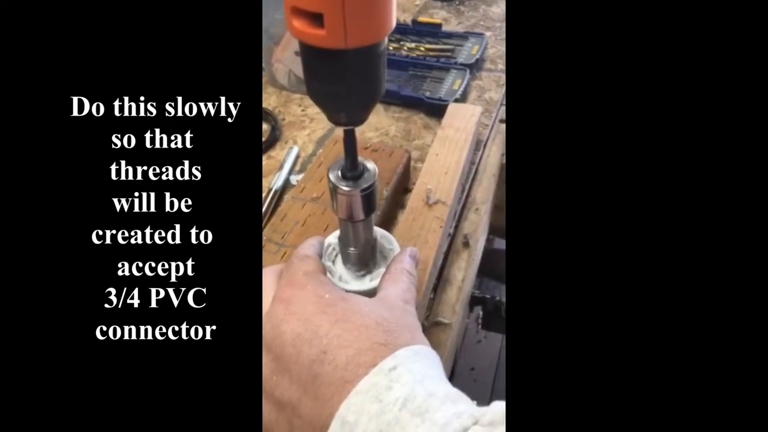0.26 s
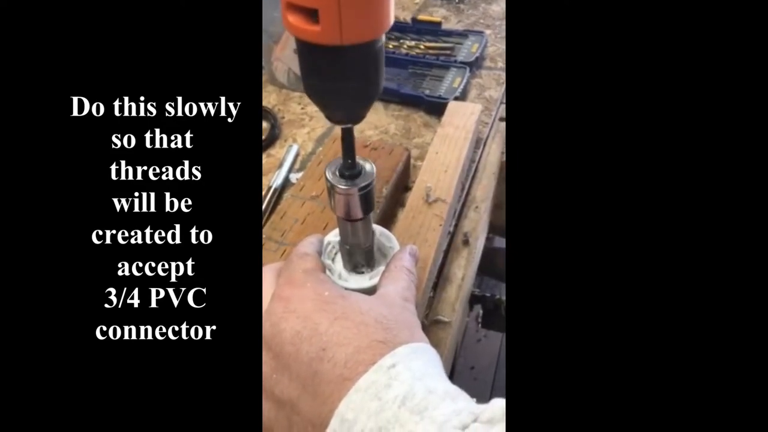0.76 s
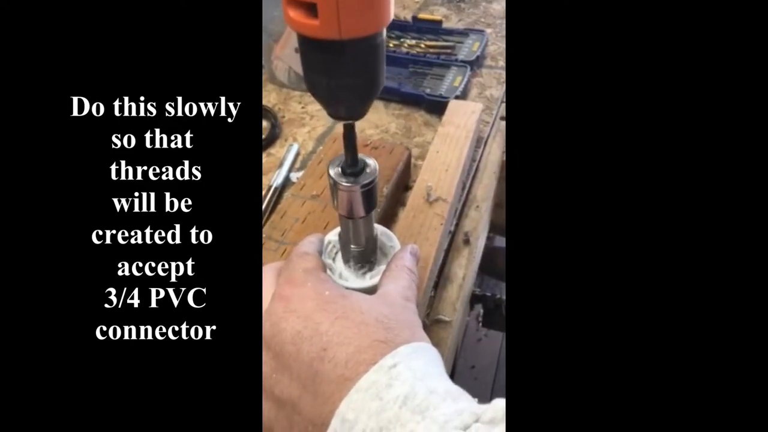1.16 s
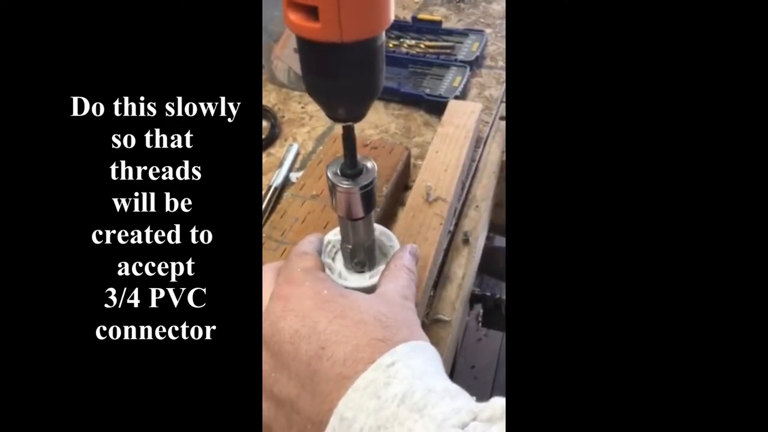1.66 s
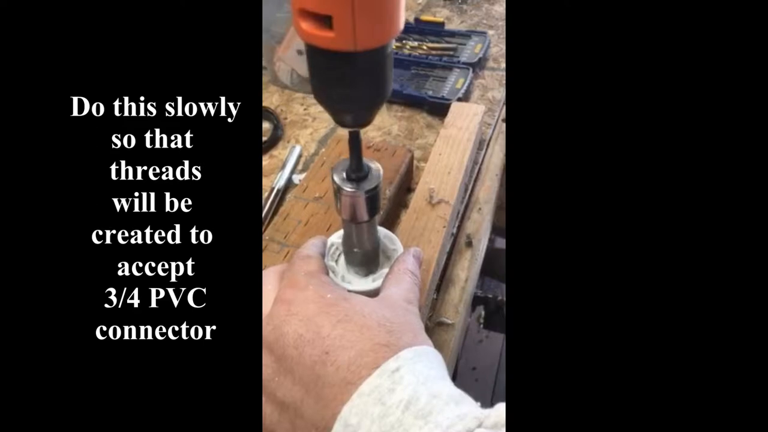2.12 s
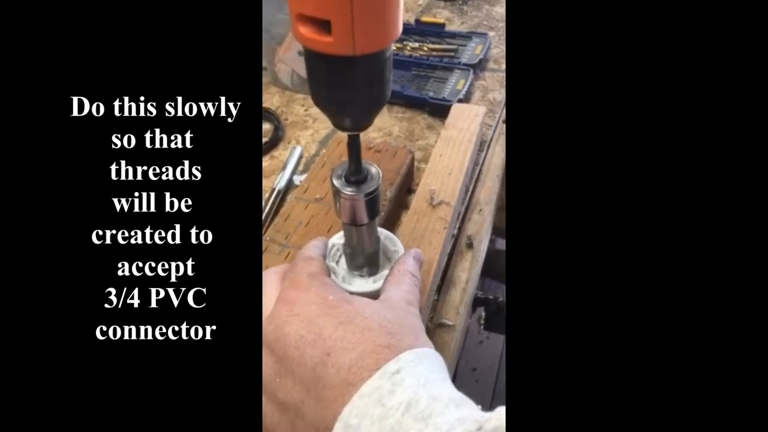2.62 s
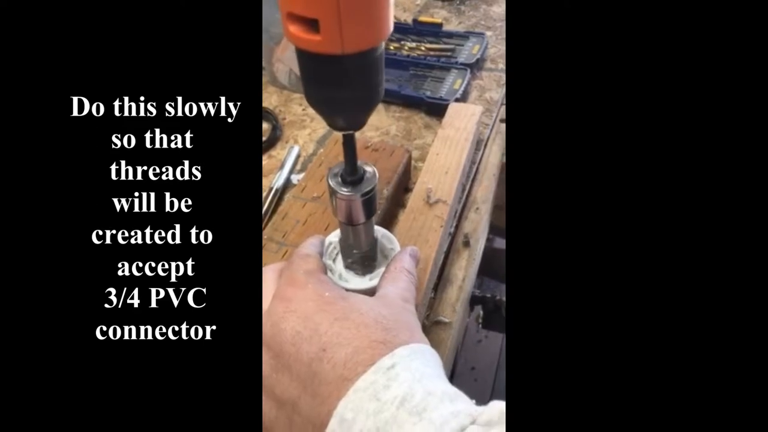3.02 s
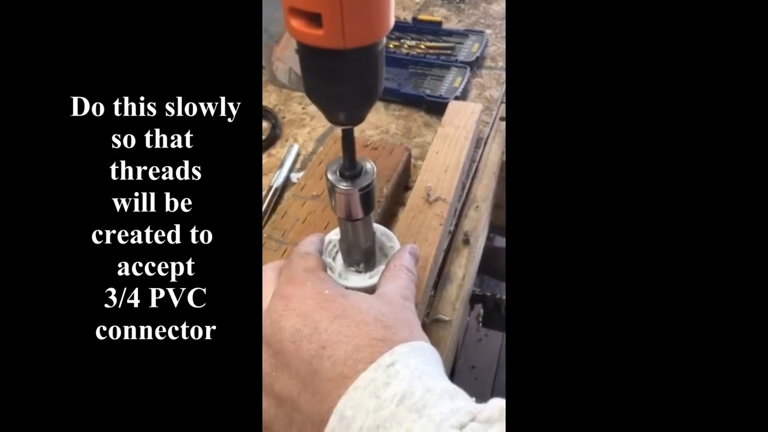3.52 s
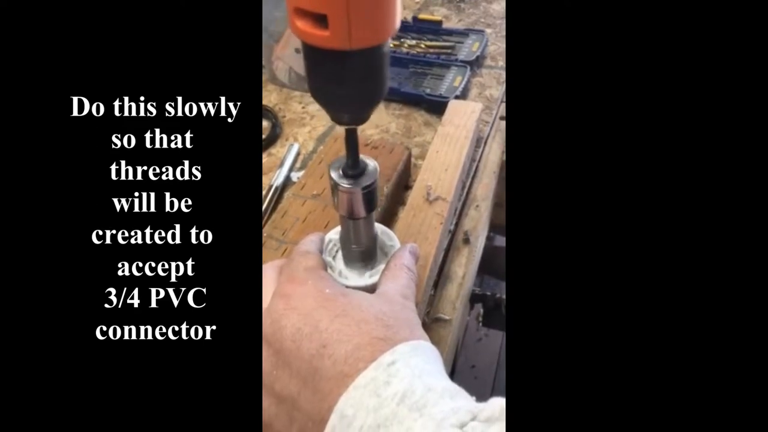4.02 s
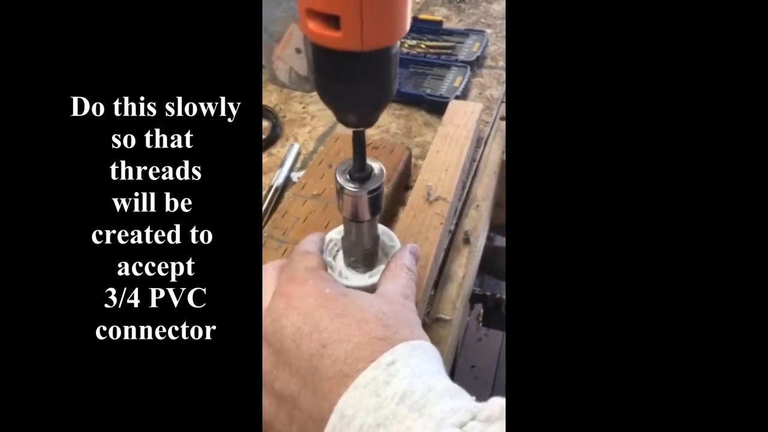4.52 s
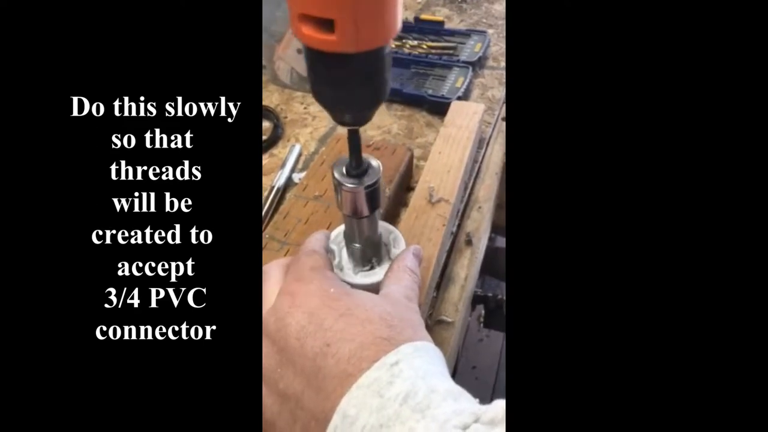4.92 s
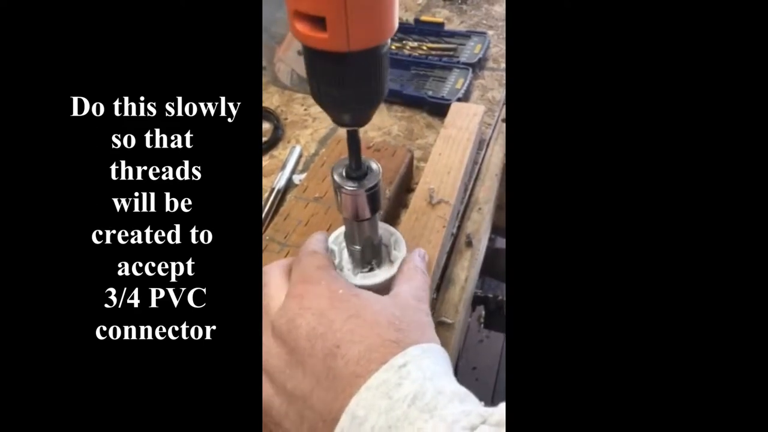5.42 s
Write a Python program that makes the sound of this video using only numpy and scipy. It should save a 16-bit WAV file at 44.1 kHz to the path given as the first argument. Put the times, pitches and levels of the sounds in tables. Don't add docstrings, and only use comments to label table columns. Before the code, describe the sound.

Coarse, buzzing gear rattle from a small electric drill, held close, almost mono. A first run of under half a second is followed by over a dozen jabs of the trigger, mostly slow and grating, a few fast and whining. Sharp clicks and low bench bumps punctuate them. Work stops near the end, leaving soft air, a distant motor hum, thin bird notes and one light tap.

```python
import sys
import numpy as np
from scipy import signal
from scipy.fft import rfft, irfft
from scipy.io import wavfile
from scipy.ndimage import uniform_filter1d

SR = 44100
rng = np.random.default_rng(int(sys.argv[2]) if len(sys.argv) > 2 else 0)


def wav_out(sig):
    wavfile.write(sys.argv[1], SR, np.round(np.clip(np.atleast_2d(sig).T, -1, 1) * 32767).astype(np.int16))


def invert_db(level):
    return 10 ** (np.asarray(level, dtype=float) / 20)


N = 250047


def level(x, db):
    return x * invert_db(db) / np.sqrt(np.mean(x ** 2))


def curve(table, column):
    rows = np.array(table, float)
    return np.interp(np.arange(N) / SR, rows[:, 0], rows[:, column])


def colour(x, points, peaks=(), size=2048):
    hz = np.maximum(np.arange(size // 2 + 1) * SR / size, 1)
    points = np.array(points)
    db = np.interp(np.log(hz), np.log(points[:, 0]), points[:, 1])
    db = db + sum(lift / (1 + (2 * (hz - f) / w) ** 2) for f, w, lift in peaks)
    cep = irfft(np.log(invert_db(db)))
    cep[1:size // 2] *= 2
    cep[size // 2 + 1:] = 0
    return signal.fftconvolve(x, irfft(np.exp(rfft(cep))))[:N]


def split(x, hz, kind, order=4):
    return signal.sosfilt(signal.butter(order, hz, kind, fs=SR, output="sos"), x)


def walk(rate):
    k = int(SR / rate)
    held = np.repeat(rng.standard_normal(N // k + 1), k)
    return 1.3 * uniform_filter1d(uniform_filter1d(held, k), k)[:N]


def knocks(turns, slip, scatter_db):
    whole = np.arange(1, int(turns[-1]))
    chance = rng.standard_normal((N // 8, 2))[:len(whole)]
    at = np.clip(np.interp(whole + slip * chance[:, 0], turns, np.arange(N)), 0, N - 2)
    size, first = invert_db(scatter_db * chance[:, 1]), at.astype(int)
    early = np.bincount(first, size * (1 + first - at), N)
    return early + np.bincount(first + 1, size * (at - first), N)


def steady(x, size=SR // 40):
    return x / np.sqrt(uniform_filter1d(x ** 2, size) + 1e-9)


# frequency in Hz, density in dB per Hz.
SHED = [(88, -2.5), (150, -21.5), (358, -8), (1270, -5.5), (1510, -2.5), (4240, -18.5), (4980, -27),
        (8190, -23.5), (10500, -55), (13600, -85), (22000, -120)]
# time in seconds, level in dB.
STIR = [
    (0, -54),
    (4.7, -53),
    (4.77, -47),
    (5.14, -48.5),
    (5.2, -65.5),
    (5.39, -63.5),
    (5.41, -72),
]


def shed():
    t = np.arange(N) / SR
    air = level(colour(rng.standard_normal(N), SHED), -66) * invert_db(walk(18))
    stir_colour = [(300, -1.5), (600, 0.5), (3000, -2.5), (5000, -4.5), (10000, -14.5)]
    stir = level(colour(rng.standard_normal(N), stir_colour), 0) * invert_db(curve(STIR, 1))
    hum = level(split(rng.standard_normal(N), [58, 68], "band", order=2), -48)
    hum = hum + invert_db(-62) * np.sin(2 * np.pi * 126 * t)
    duck_db = -4.5 * np.clip((5.2 - t) / .1, 0, 1)
    return air + stir + hum * invert_db(duck_db)


# time in seconds, pitch in Hz, level in dB.
BIRD = [
    [(5.34, 7650, -84), (5.365, 8000, -72), (5.39, 8150, -72), (5.42, 7900, -73), (5.455, 7520, -77.5),
     (5.49, 7750, -76), (5.52, 8250, -73)],
    [(5.605, 8450, -87.5), (5.635, 7850, -79.5), (5.67, 6900, -81)],
]


def bird():
    out = 0
    for call in BIRD:
        start, end = call[0][0], call[-1][0]
        on = np.interp(np.arange(N) / SR, [start, start + 0.012, end - .01, end], [0, 1, 1, 0])
        tone = np.sin(2 * np.pi * np.cumsum(curve(call, 1)) / SR)
        out = out + np.sqrt(2) * on * invert_db(curve(call, 2) + 2.45 * walk(66)) * tone
    return out


def room(x):
    t60_s, rise_s = 0.033, 0.0064
    t = np.arange(SR // 2) / SR
    tail = rng.standard_normal(len(t)) * np.exp(-np.log(1000) * t / t60_s) * np.minimum(t / rise_s, 1)
    return signal.fftconvolve(x, tail / np.sqrt(np.sum(tail ** 2)))[:N]


# pressed, let go and standing still in seconds, top mesh rate in Hz,
# housing level at the top in dB.
PULLS = [(0.041, 0.409, 0.5, 346, -20.5), (0.576, 0.72, 0.87, 400.3, -19.5),
         (.897, 1.031, 1.143, 340.2, -19), (1.245, 1.398, 1.655, 929.2, -14.5),
         (1.713, 1.886, 2.019, 430.9, -18.5), (2.111, 2.267, 2.498, 852.5, -14.5),
         (2.592, 2.715, 2.785, 268.3, -20.5), (2.882, 3.01, 3.088, 279.7, -21),
         (3.076, 3.1, 3.08, 170, -22.5), (3.077, 3.27, 3.37, 358.2, -19.5),
         (3.44, 3.566, 3.654, 380.7, -19), (3.71, 3.822, 3.86, 200, -23), (3.93, 4.071, 4.3, 828.7, -14.5),
         (4.347, 4.505, 4.694, 926.3, -14), (4.818, 4.971, 5.065, 604.2, -11.5)]


def motor():
    crawl_hz, spin_up_s = 70.12, .165
    climb_bend, coast_bend = .85, 1.2
    t = np.arange(N) / SR
    hz, db, on = np.full(N, crawl_hz), np.full(N, -70.), np.zeros(N)
    for pressed, let_go, still, top_hz, top_db in PULLS:
        at = slice(int(pressed * SR), int(still * SR))
        now = t[at]
        driven = now < let_go
        climb = np.minimum((now - pressed + 1e-4) / min(let_go - pressed, spin_up_s), 1) ** climb_bend
        coast = np.clip((still - now) / (still - let_go), 0, 1) ** coast_bend
        rate = crawl_hz + (top_hz - crawl_hz) * np.where(driven, climb, coast)
        speed_db = np.where(driven, 4.5, 6.5) * np.log2(rate / top_hz)
        dip_db = np.where(driven, 6, 21) * np.exp((crawl_hz - rate) / 51.3)
        idle_db = 9 * (now < pressed + .021)
        loud = top_db + speed_db - dip_db - idle_db
        hz[at], db[at], on[at] = np.maximum(hz[at], rate), np.maximum(db[at], loud), 1
    return hz, db, uniform_filter1d(on, SR // 250)


def boards(modes, lump_db):
    total = 0
    for f, width, db in modes:
        band = split(rng.standard_normal(N), [f - width / 2, f + width / 2], "band", order=2)
        total = total + level(band, db) * invert_db(lump_db * walk(18))
    return steady(total, size=SR // 8) * invert_db(2.0 * walk(45))


# frequency in Hz, width in Hz, level in dB.
THUD = [(38, 16, -19.5), (58, 18, 3), (70.7, 11, 1), (88.3, 25, 6), (121, 18, -3)]
# frequency in Hz, width in Hz, level in dB.
BOOM = [(140.2, 24, -6), (175.4, 25.5, -2), (208.3, 29, -0.5), (270.6, 48, -2), (335.5, 70, -10.5),
        (417, 50, -12), (570, 180, -13.5)]
# peak time in seconds, thud level in dB, boom level in dB.
JOLTS = [(0.151, -38, -40.5), (0.274, -36, -38), (0.422, -40.5, -42.5), (0.749, -34.5, -40.5),
         (.86, -42, -53), (1.06, -38.5, -40), (1.39, -31, -28.5), (1.448, -18.5, -21), (1.52, -30, -36),
         (1.6, -44, -56), (1.97, -41.5, -47), (2.22, -54, -32.5), (2.282, -22, -36), (2.32, -25, -29),
         (2.4, -38.5, -45), (2.68, -60, -40), (3.059, -42, -48), (3.302, -34.5, -42), (3.56, -51, -32),
         (3.62, -40, -46), (4.0, -46, -43), (4.07, -36, -25.5), (4.11, -26.5, -29), (4.16, -30.5, -39),
         (4.48, -46, -28), (4.52, -33, -30), (4.6, -28.5, -33.5), (4.85, -68, -38.5), (5.015, -35.5, -40)]


def bench():
    t = np.arange(0, N + 64, 64) / SR
    rows = np.array(JOLTS)[:, :, None]
    shake = invert_db(motor()[1] - 36.5)

    def jolts(column, rise_s, fall_s):
        away = np.maximum((rows[:, 0] - t) / rise_s, (t - rows[:, 0]) / fall_s)
        return np.repeat(invert_db((rows[:, column] - 20 * away).max(0)), 64)[:N]

    thud, boom = jolts(1, 0.027, 0.13), jolts(2, 0.095, 0.099)
    bumps = knocks(np.arange(N) * 55 / SR, .4, 3.5) * np.sign(walk(60))
    bumps = level(split(split(bumps, 80, "high", order=2), 240, "low"), -4)
    low = (thud + invert_db(-61) + shake) * boards(THUD, 4.5)
    high = (0.68 * boom + invert_db(-60) + shake) * boards(BOOM, 3.7)
    return low + high + (0.59 * thud + boom) * bumps


# time in seconds, peak level in dB, treble level in dB.
TRIGGER = [(0.0159, -28, -12), (.031, -26, -12), (0.5423, -29.5, -7), (0.565, -26, -11),
           (0.8823, -25.5, -11), (1.1958, -27, -7), (1.216, -26, -13), (1.2308, -20, -18),
           (1.6557, -36.5, 1), (1.6831, -27, -9), (1.6966, -25.5, -11), (2.071, -33, -3),
           (2.098, -24.5, -12), (2.531, -24, -15), (2.5647, -28, -11), (2.83, -31.5, -2.5),
           (2.8649, -26, -7), (3.3822, -36, -5), (3.4007, -30, -18), (3.415, -26, -12), (3.682, -29, -10),
           (3.6977, -25.5, -13), (4.3046, -34, -9), (4.3326, -29.5, -11), (4.7516, -25, -16),
           (4.7652, -12.5, -16), (4.815, -26, -10), (5.126, -24.5, -15)]
# time in seconds, peak level in dB.
SLACK = [(.068, -33), (.4874, -29), (0.6014, -23), (0.92, -27), (1.2506, -19.5), (1.27, -14), (1.731, -37),
         (2.115, -25), (2.1346, -25), (2.587, -27.5), (2.6, -33), (2.916, -24), (3.0996, -23), (3.432, -27),
         (3.467, -26), (3.7323, -29), (3.808, -14), (3.9306, -26), (3.952, -28), (4.3463, -32),
         (4.368, -36), (4.399, -15), (4.8328, -30), (5.087, -36), (5.161, -49), (5.174, -42),
         (2.487, -38.5), (3.644, -33), (3.72, -27), (4.285, -35.5)]
# time in seconds, peak level in dB, ring in Hz, treble level in dB.
TAP = (5.5117, -37, 1350, -26)


def clicks():
    trigger_hz, slack_hz, slack_treble_db = 3185, 2673, -28.5
    decay_s, rise_s = 0.028, 0.00084
    snaps = [(s, db, trigger_hz, treble_db) for s, db, treble_db in TRIGGER] + [TAP]
    snaps += [(s, db, slack_hz, slack_treble_db) for s, db in SLACK]
    out, t = np.zeros(N + 4096), np.arange(4096) / SR
    fade = np.exp(-np.log(1000) * t / decay_s) * np.minimum(t / rise_s, 1)
    for s, db, hz, treble_db in snaps:
        hiss = rng.standard_normal(4096)
        hz = hz * (1 + 0.072 * hiss[0])
        ring = .1 * np.sin(2 * np.pi * hz * t)
        puff = 0.33 * split(hiss, [1000, 5000], "band") + 0.31 * split(hiss, [500, 1100], "band")
        treble = invert_db(treble_db - 12) * split(hiss, 5000, "high")
        snap = fade * (ring + puff + treble)
        start = int(s * SR)
        out[start:start + 4096] += invert_db(db) * snap / np.abs(snap).max()
    return out[:N]


def kicked(hz, coasting):
    kick_hz = 29.94
    kick = (np.arange(N) / SR * kick_hz + .15) % 1 - .5
    sag = kick * (np.gradient(hz) * SR / kick_hz + .06 * hz)
    return hz - (1 - coasting) * uniform_filter1d(sag, SR // 200)


# multiple of the mesh rate, level in dB.
WHINE = [(1, -26), (2, -21), (3, -24), (4, -18), (5, -24)]


def gears(hz, coasting):
    turns = np.cumsum(hz) / SR
    teeth = knocks(turns, .013, 2.5) * invert_db(2.5 * walk(45))
    teeth = steady(teeth - uniform_filter1d(teeth, size=34))
    stray = steady(knocks(turns * 1.57, .6, 3.2) * np.sign(walk(900)))
    after_knock = np.exp(-(turns % 1) / .25)
    rattle = rng.standard_normal(N) * (.1 + hz / 1200 + after_knock) * invert_db(2.2 * walk(150))
    rattle = steady(rattle)
    share = np.clip(.05 + hz / 1600 * (.85 + .55 * coasting), .33, .8)
    force = np.sqrt(share) * teeth + np.sqrt(1 - share) * (0.75 * stray + 0.85 * rattle)
    whine = sum(invert_db(db + 4.5 * walk(40)) * np.cos(2 * np.pi * k * turns) for k, db in WHINE)
    force += whine * np.clip((hz - 380) / (800 - 380), 0, 1) * (.7 + .3 * coasting)
    chop_hz = 61.3
    return force * (1 + 0.28 * np.exp(-hz / 200) * np.cos(2 * np.pi * chop_hz * np.arange(N) / SR))


# frequency in Hz, level in dB.
SHELL = [(300, -29), (450, -24.5), (800, -23.5), (1500, -20.5), (2100, -5.5), (2500, -9), (4500, -15),
         (5000, -21.5), (6300, -18.5), (7200, -32.5), (9000, -40), (10600, -68)]
# frequency in Hz, width in Hz, lift in dB.
HOUSING = [(612, 130, 12.5), (1028, 144, 9.5), (1376, 280, 9.5), (1777, 120, 3.5), (2706, 270, 8.5),
           (3408, 280, 4.5), (3770, 240, 3), (4443, 470, 5.5), (5260, 39, 8.5), (5707, 400, 10),
           (6880, 340, 6), (7960, 800, 12), (10045, 1510, 37)]


def housing(force):
    return colour(force, SHELL, HOUSING)


def panels(ring, bright_db):
    body = split(split(ring, 1950, "high"), 4900, "low")
    lower = level(split(body, 3150, "low"), 0) * invert_db(0.82 * walk(30))
    upper = level(split(body, 3150, "high"), 0) * invert_db(1.0 * walk(30) + bright_db)
    return level((lower + upper) / np.sqrt(1 + invert_db(2 * bright_db)), 0)


def brushes(ring):
    hiss = split(housing(rng.standard_normal(N)), 7300, "high")
    return level(level(split(ring, 4900, "high"), 0) + level(hiss, -26), 0)


def drill():
    hz, body_db, running = motor()
    coasting = uniform_filter1d(1. * (np.gradient(hz) < 0), SR // 100)
    bright_db = -4.5 + 6 * hz / 1000 + 3 * coasting + 0.76 * (np.maximum(body_db, -35) + 19.5)
    hz = kicked(hz, coasting)
    hiss_db = -26 + 0.011 * hz + 1100 / (hz + 40) + .5 * bright_db
    low_db = -8.5 - 0.36 * (np.maximum(body_db, -50) + 21.5)
    ring = housing(gears(hz, coasting))
    main = panels(ring, bright_db)
    low = level(split(ring, 1950, "low") * invert_db(2.2 * walk(25.16)), 0)
    chuck = boards([(226, 46, -6), (296.3, 58, 7.5), (339.0, 110, -1.5)], 4.2)
    mix = main + invert_db(low_db) * low + invert_db(hiss_db) * brushes(ring) + invert_db(low_db - 14.5) * chuck
    return running * invert_db(body_db) * mix


# frequency in Hz, level in dB.
BENCH_SIDE = [(60, -31), (125, -28), (250, -19), (500, -18)]


def scene():
    near = drill() + clicks()
    mid = near + invert_db(-12) * room(near) + bench() + shed() + bird()
    side_colour = [(250, 5.0), (600, 5.5), (1200, 4), (3000, -5), (5000, 6.0), (9000, 11.5)]
    side = invert_db(-23) * room(colour(near, side_colour))
    side = side + invert_db(-34.5) * shed() + colour(bench(), BENCH_SIDE)
    return np.array([invert_db(0.61) * (mid + side), invert_db(0.93) * (mid - side)])


def mask(dry):
    under_db, size, bins = -37, 1024, 7
    hz, _, z = signal.stft(dry, SR, nperseg=size)
    power = uniform_filter1d(np.abs(z.mean(0)) ** 2, 7, axis=1) + 1e-18
    ring = power[(hz > 2400) & (hz < 3600)].mean(0)
    band = np.arange(len(hz)) // bins
    band_power = np.array([power[band == b].mean(0) for b in range(band[-1] + 1)])
    band_db = 10 * np.log10(band_power / ring)
    kept = (band_db > under_db)[band] | (hz < 7000)[:, None]
    return signal.istft(z * kept, SR, nperseg=size)[1][:, :N]


def low_pass(x):
    return signal.sosfilt(signal.butter(12, 11310, fs=SR, output="sos"), x)


def record(dry):
    dry = np.tanh(1.084 * dry) / 1.083
    dry = signal.sosfiltfilt(signal.ellip(10, .2, 70, 10500, fs=SR, output="sos"), dry)
    return low_pass(mask(dry))


dry = scene()
out = record(dry)
wav_out(out)
```